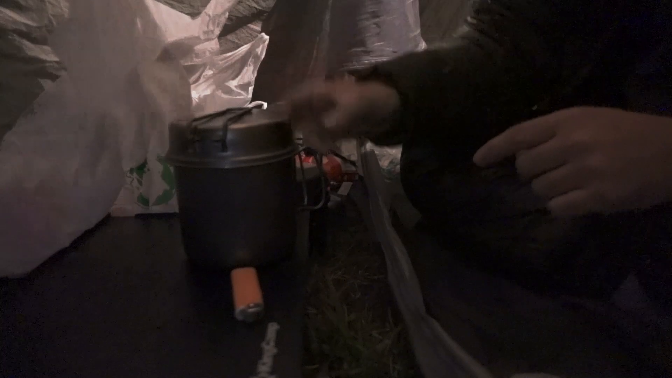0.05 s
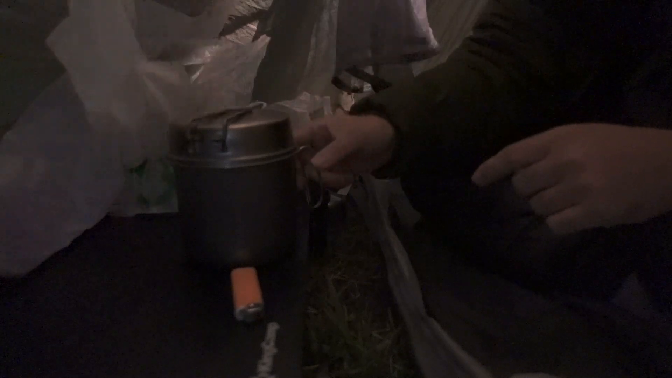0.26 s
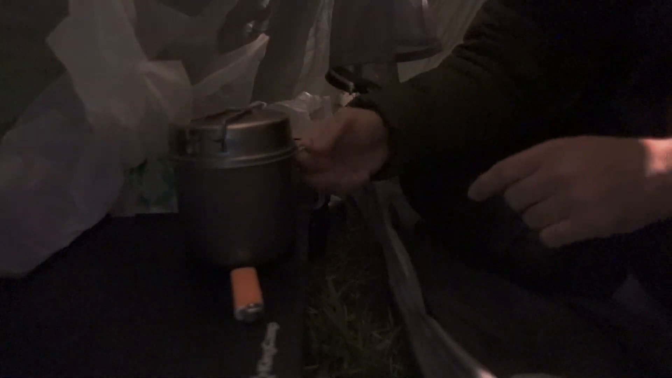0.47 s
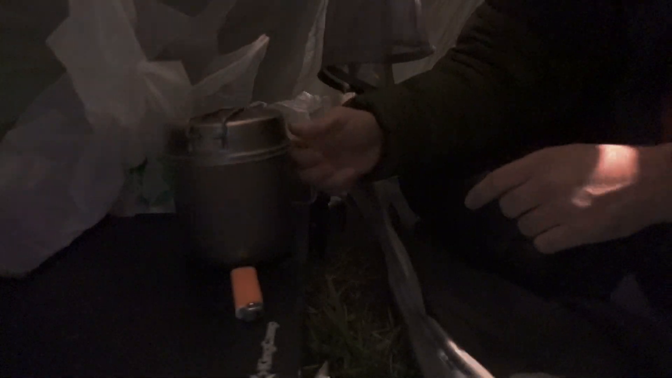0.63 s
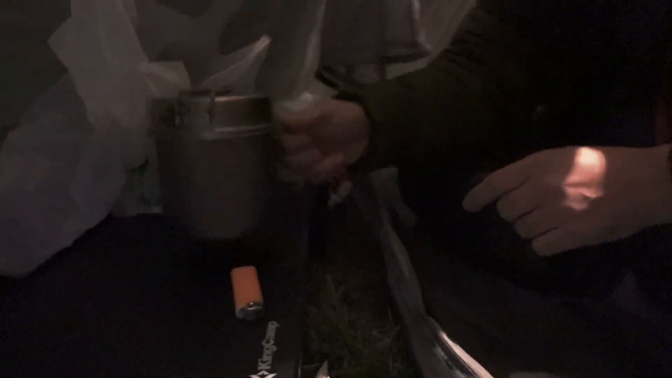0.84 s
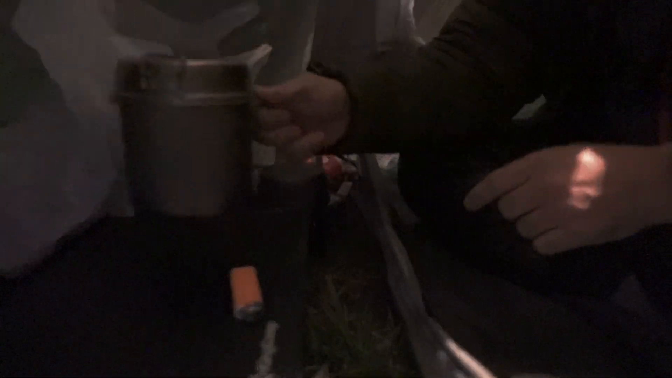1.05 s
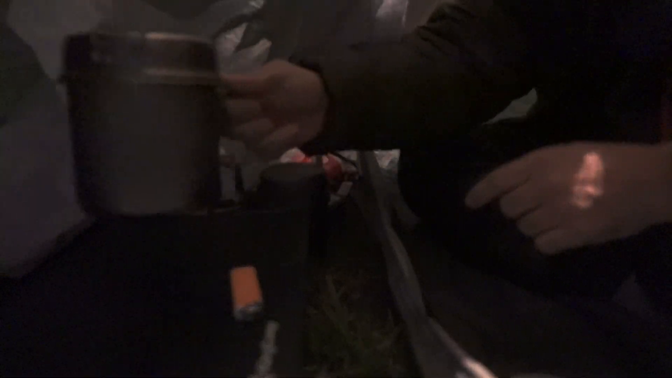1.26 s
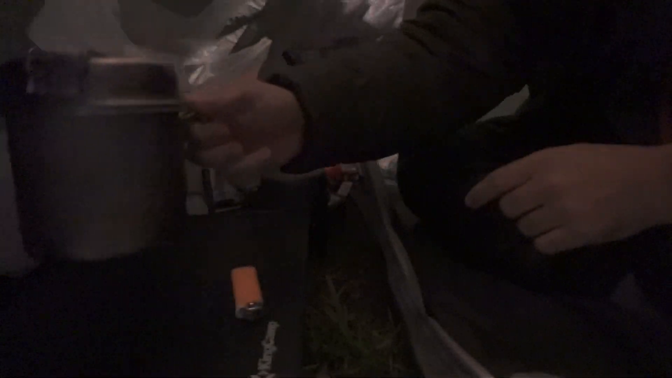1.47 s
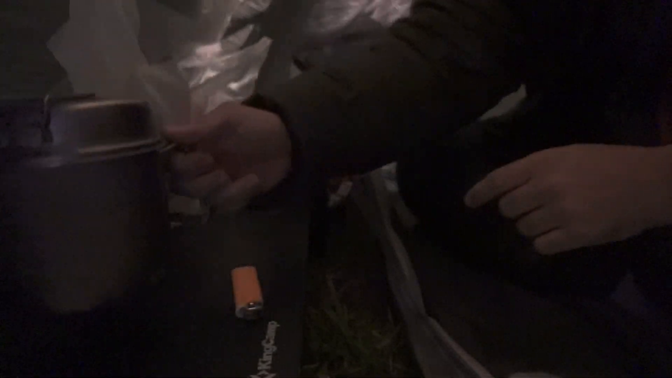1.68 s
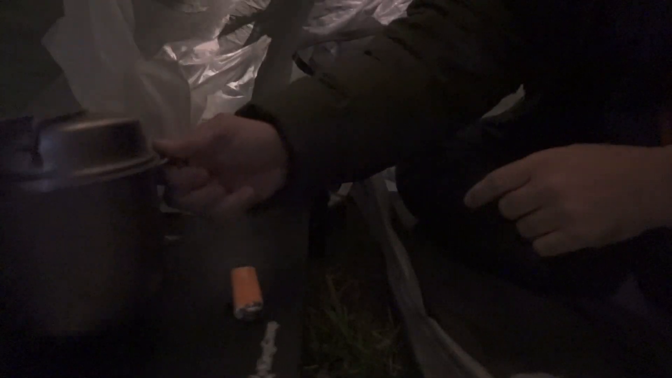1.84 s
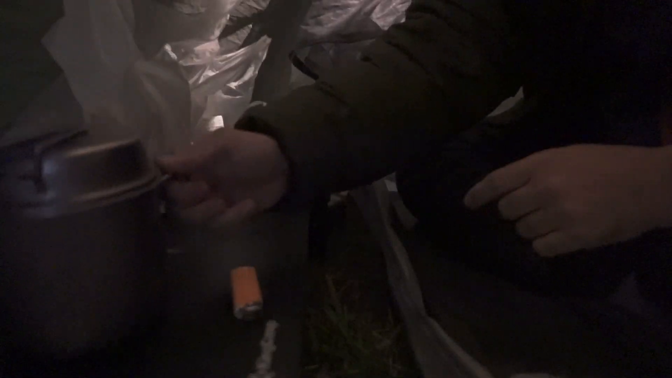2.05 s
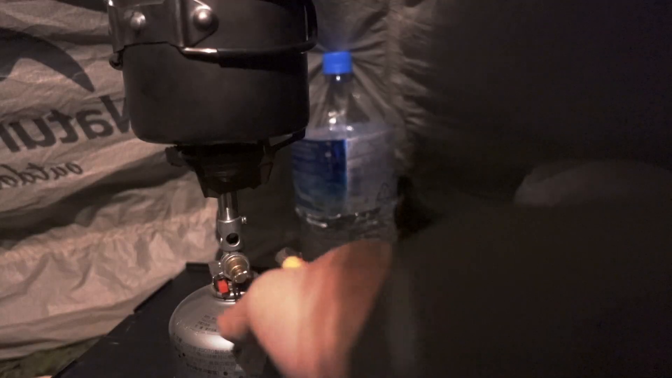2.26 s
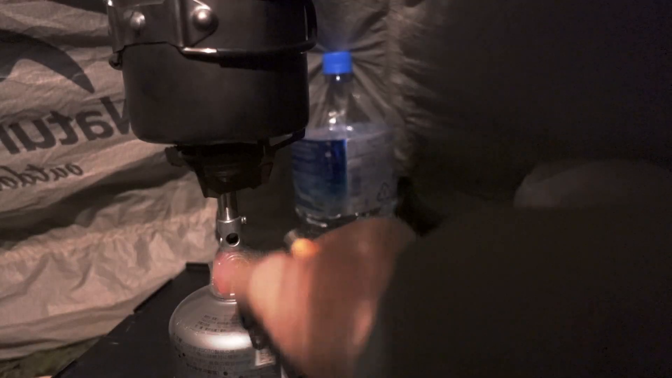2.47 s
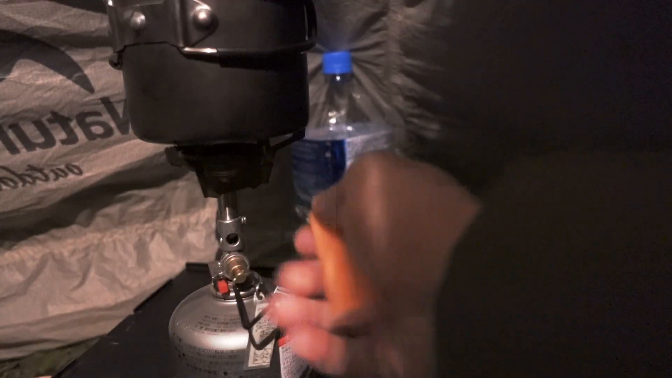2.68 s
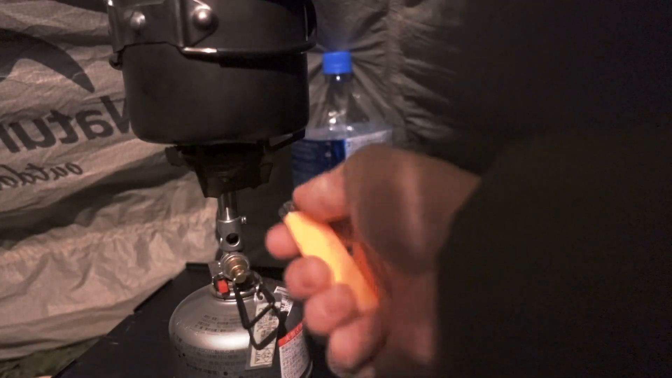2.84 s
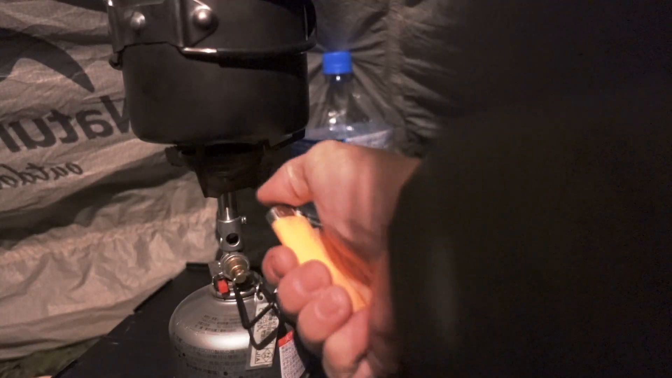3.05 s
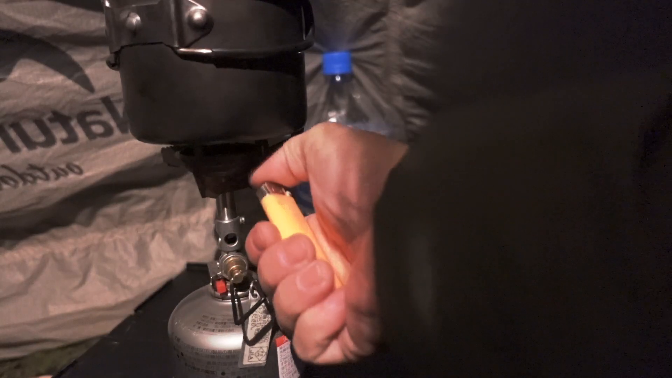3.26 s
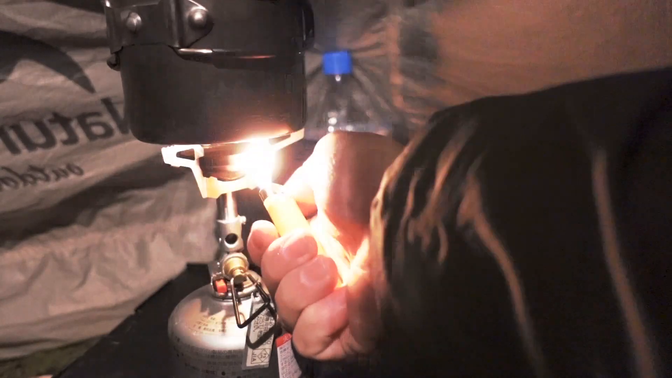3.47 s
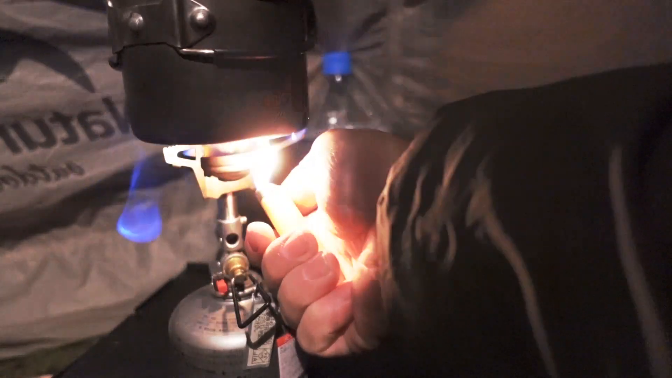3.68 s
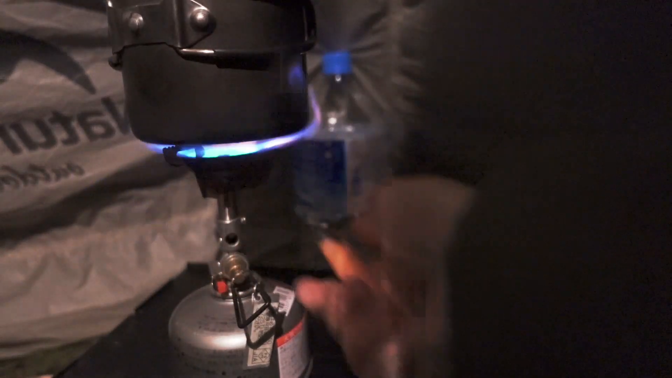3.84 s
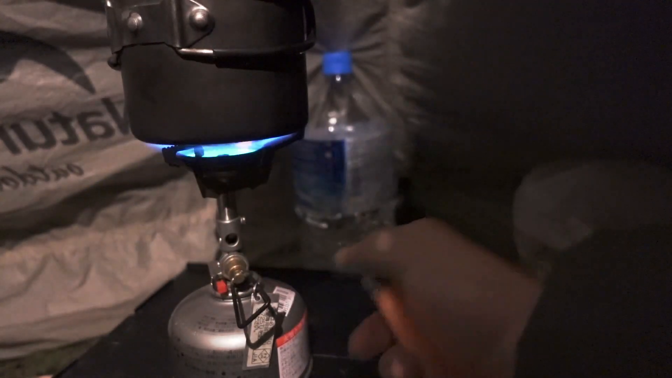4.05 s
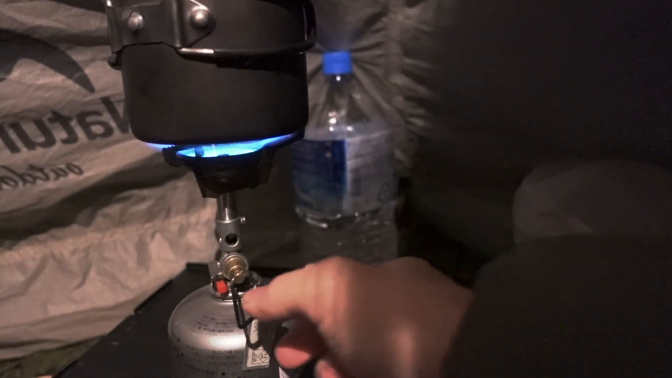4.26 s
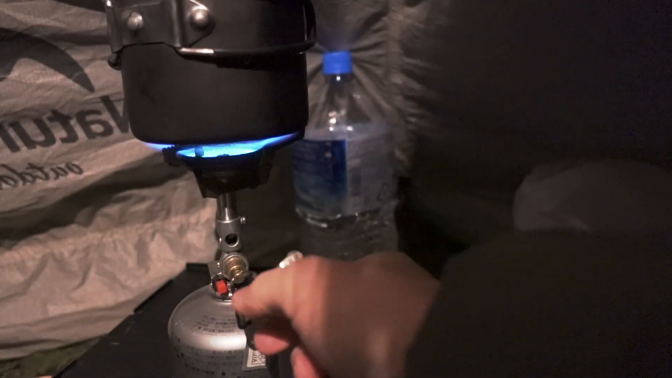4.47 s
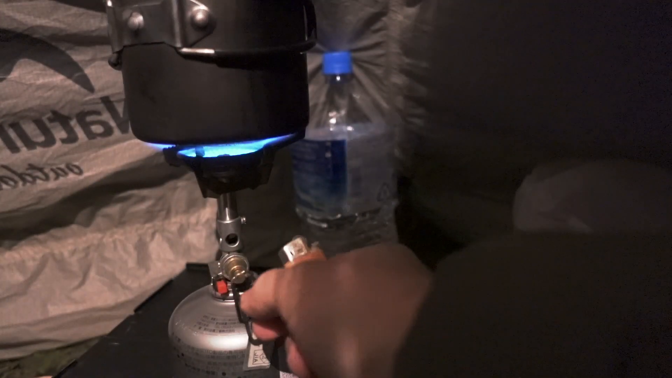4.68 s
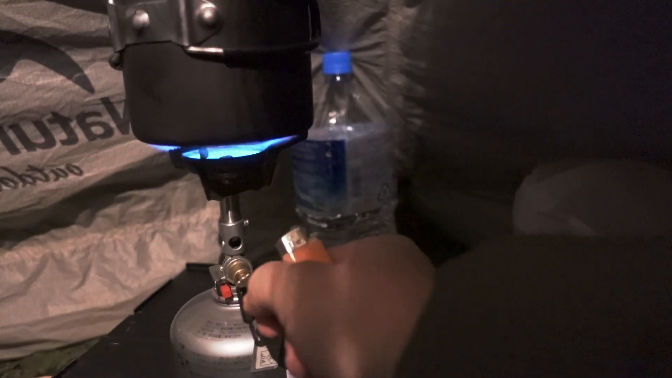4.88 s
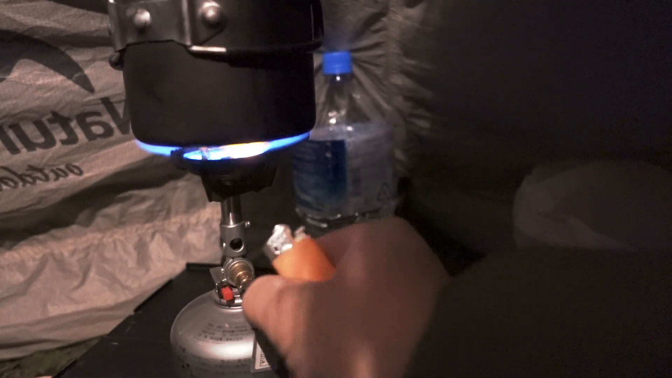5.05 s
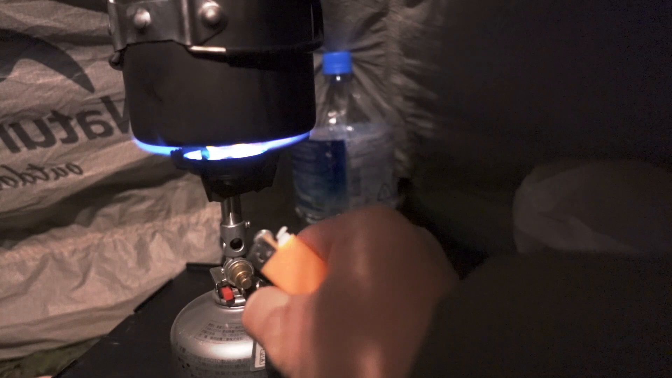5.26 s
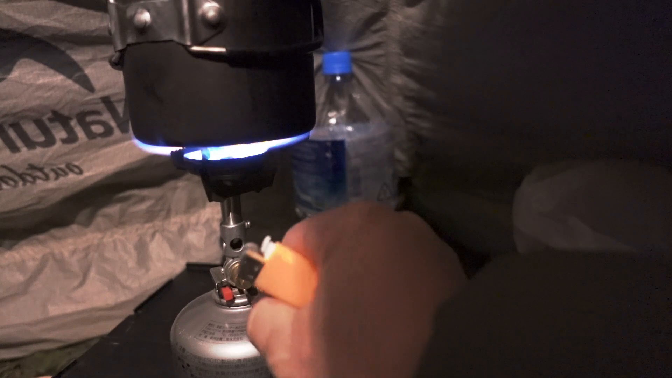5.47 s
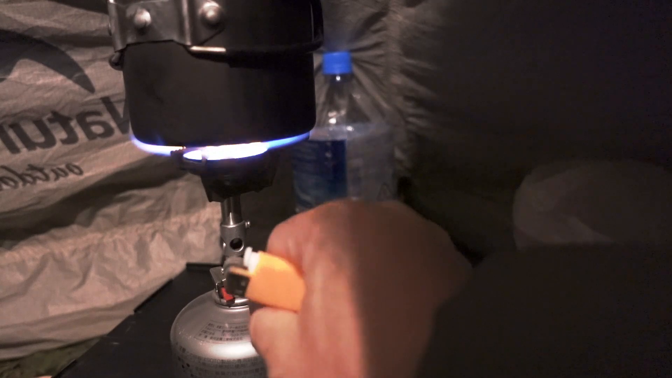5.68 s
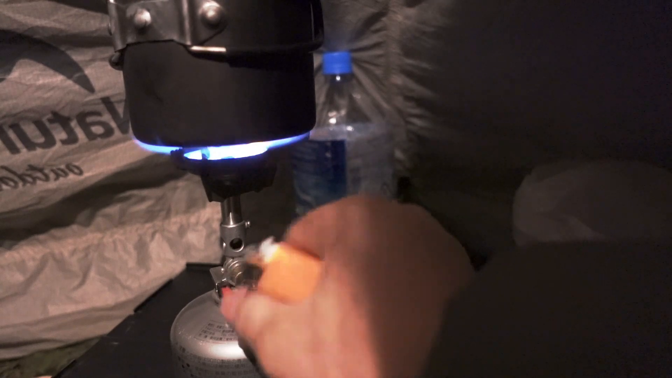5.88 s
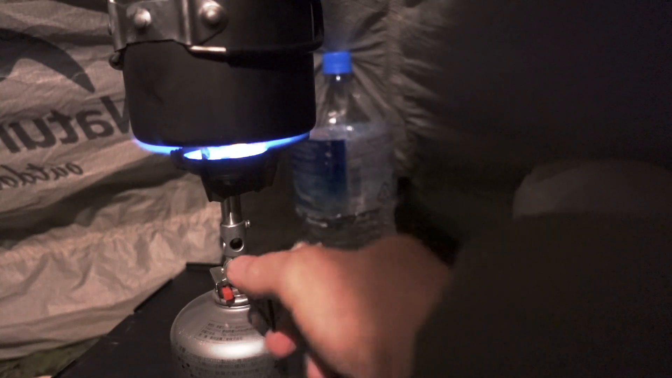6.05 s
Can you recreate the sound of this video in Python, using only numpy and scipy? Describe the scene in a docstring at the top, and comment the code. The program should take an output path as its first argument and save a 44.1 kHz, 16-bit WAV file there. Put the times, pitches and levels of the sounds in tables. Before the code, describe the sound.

Close in a still tent, metal cookware slides, clinks and thumps down, followed by a flint strike, soft gas pops, a stove scrape and strengthening hiss.

```python
"""Inside a tent, close to the microphone: a metal pot is slid and lifted by its rattling handle and set down.
Then a gas valve opens, a lighter is struck, the burner catches with soft pops and its hiss hardens as the valve
turns, while the stove scrapes once over the ground. Still air lies under all, and a low rumble comes in at 2.05
s. Rubs are trains of tiny noisy slips ringing metal, rattles and ticks are short noise bursts, the knock is a
sum of decaying modes, pops are sinking low cycles with noise, and the gas is coloured noise."""
import sys
import numpy as np
from scipy import signal
from scipy.fft import rfft, irfft
from scipy.io import wavfile
from scipy.ndimage import uniform_filter1d, map_coordinates

SR = 44100
rng = np.random.default_rng(int(sys.argv[2]) if len(sys.argv) > 2 else 0)


def to_linear_factor(level_db):
    """Convert decibel levels (scalar or array-like) to linear amplitude factors."""
    exponent = np.asarray(level_db, float) / 20
    return 10 ** exponent


def bounce(signal):
    """Save signal as a 16-bit WAV file at the path given by the first command-line argument."""
    frames = np.transpose(np.atleast_2d(signal))
    limited = np.clip(frames, -1, 1)
    pcm = np.round(limited * 32767).astype(np.int16)
    wavfile.write(sys.argv[1], SR, pcm)


N = 269892  # samples in the scene

# Low rumble that comes in at 2.05 s. Each row: time in seconds, level in dB.
RUMBLE_LEVEL = [(2.05, -42.5), (2.25, -37), (2.93, -35.5), (3.85, -36), (6.12, -35.5)]
# Colour of the rumble and of the still air. Each row: frequency in Hz, relative density in dB per Hz.
RUMBLE_COLOUR = [(15, -80), (25, -55), (44, -17), (70, -19.5), (162, 1), (183, 2), (242, -1), (361, -15),
                 (421, -13), (659, -17.5), (1000, -31.5), (1300, -46), (2200, -120)]
AIR_COLOUR = [(15, -67), (25, -27), (53, -6), (249, 1), (301, 1.5), (335, -4), (641, -9.5), (796, -22),
              (1840, -23), (2610, -25.5), (3520, -26), (8360, -32), (16000, -35)]
# Still air. Each row: time in seconds, level in dB.
AIR_LEVEL = [(0, -44), (.43, -43.5), (.47, -40.5), (2.0, -42.5)]

# Rubbing strokes in full contact. Each row: start in seconds, end in seconds, start level in dB, end level in dB.
POT_STROKES = [(0, .34, -25.5, -25.5), (.38, 0.47, -28.5, -27), (.52, 0.863, -24.5, -24.5),
               (1.5, 1.83, -43.5, -59)]
HANDLE_STROKES = [(0, 0.55, -39.5, -42.5), (.9, 0.97, -45, -31.5), (1.03, 1.19, -30, -33),
                  (1.096, 1.205, -26.5, -28), (1.23, 1.74, -34.5, -50.5)]
SET_DOWN_STROKES = [(2.0795, 2.092, -21, -29.5), (2.092, 2.128, -27, -38.5)]
STOVE_STROKES = [(4.79, 4.865, -42, -28.5), (4.86, 4.945, -30, -28.5), (4.945, 5.02, -31, -34),
                 (5.03, 5.06, -47, -40.5)]
FLINT_STROKES = [(3.452, 3.474, -35.5, -21.5), (3.477, 3.483, -16.5, -17.5), (3.488, 3.512, -31, -40.5)]

# Broad colour of each rubbed thing. Each row: frequency in Hz, relative density in dB per Hz.
POT_COLOUR = [(530, -59), (900, -29), (1220, -60), (1550, -28), (2390, -11), (2830, -14), (4740, -16.5),
              (5960, -0.5), (8250, -20.5), (16000, -29.5)]
HANDLE_COLOUR = [(900, -15.5), (1500, -12.5), (3500, -8), (5400, 0), (9000, -2), (15000, -8.5),
                 (16000, -22)]
GROUND_COLOUR = [(300, -12), (700, -5.5), (1200, -12.5), (7840, -12), (13200, -20.5), (16000, -38)]
STOVE_COLOUR = [(210, -32), (350, -8), (530, -2), (871, -16.5), (1070, -9), (1630, -23.5), (3030, -18),
                (3620, -23.5), (7790, -16.5), (16000, -36)]
WHEEL_COLOUR = [(530, -68), (900, -42), (1470, -19), (2660, -20), (3150, -12.5), (5410, -16.5),
                (7230, -6.5), (9880, -7), (16000, -24)]
# What rings in each. Each row: frequency in Hz, width in Hz, relative level in dB.
POT_RINGS = [(1210, 220, -29), (2393, 145, -5), (2840, 184, -2.5), (3444, 140, -6.5), (4100, 160, -15),
             (4530, 88, -11), (5060, 70, -6), (5350, 170, -1.5), (5810, 81, 4), (7420, 21, -0.5)]
HANDLE_RINGS = [(6160, 490, -13), (9200, 2300, -1), (12400, 1100, -8)]
STOVE_RINGS = [(548, 41, 2), (633, 40, 1.5), (1014, 18, 1.5), (1088, 42, -4), (1465, 72, -12.5),
               (3080, 58, -10.5), (4020, 170, -13.5), (4560, 150, -16), (8100, 430, -21)]
WHEEL_RINGS = [(3100, 550, -8.5), (6100, 640, -6), (7400, 900, -5), (9700, 830, -3.5)]
# Modes of the pot hitting the ground. Each row: frequency in Hz, width in Hz, relative level in dB.
KNOCK_MODES = [(255, 21, 1), (494, 21, 6), (694, 50, 3.5), (775, 22, -17), (1200, 81, -0.5), (1580, 83, 4),
               (2295, 11, -11), (4550, 12, -6), (5250, 40, 2.5), (5800, 39, -0.5), (7600, 15, -19)]

# Gas flow. Each row: time in seconds, hiss level in dB, timbre (0 jet, 1 lit, 2 and above wide).
GAS = [(2.13, -51, 1.5), (2.33, -57.5, 0.5), (2.4, -54, 0.3), (2.9, -47.5, 0.2), (3.4, -52.5, 0.27),
       (3.7, -49, 1.6), (3.85, -46.5, 1.54), (4.1, -48.5, 0.96), (4.4, -52.5, 0.3), (4.58, -53.5, 1.4),
       (4.74, -54, 0.2), (5.1, -51, 1.2), (5.3, -49, 1.75), (5.55, -44.5, 1.8), (6.12, -44, 2.04)]
# Broad colour of each gas timbre. Each row: frequency in Hz, relative density in dB per Hz.
JET_COLOUR = [(530, -32), (900, -19), (1250, -32), (2660, 3.5), (6640, 0.5), (7580, 1), (8350, -2),
              (16000, -4)]
LIT_COLOUR = [(530, -32), (900, -8), (1150, -19), (1590, -28), (2120, -9), (5680, -9), (8250, -2.5),
              (16000, -14)]
WIDE_COLOUR = [(380, -26), (560, 20.5), (700, 9.5), (2000, -15), (2960, -5), (3790, -2), (4430, -1),
               (10300, 1), (16000, -13)]
# Resonances of each gas timbre. Each row: frequency in Hz, width in Hz, relative level in dB.
JET_RINGS = [(2700, 300, -5), (3840, 470, -6), (7500, 220, 10), (9500, 360, 5), (11500, 1400, 1.5)]
LIT_RINGS = [(1580, 150, -3), (2600, 440, -3), (6300, 280, -1), (7050, 240, 2), (8100, 500, 1.5),
             (10630, 840, 0.5)]
WIDE_RINGS = [(1400, 300, 3.5), (2530, 340, -3), (3790, 550, 2), (7000, 580, -4), (8250, 257, -6),
              (10400, 600, -2.5)]

# Puffs of gas catching fire. Each row: start in seconds, nominal peak in dB, pitch in Hz, cycles, rip peak in dB.
POPS = [(3.567, -19, 227, 5.8, -8), (3.5835, -12, 175, 3, -8), (3.594, -16.5, 111, 1.5, -42),
        (3.685, -6, 187, 3.05, -12.5), (4.774, -24.5, 210, 3.7, -45)]
# Latch and loose wire handle. Each row: time in seconds, nominal peak in dB, centre in Hz, t60 in seconds.
RATTLES = [(0.35, 0.5, 6900, 0.11), (0.9975, -10, 7860, 0.028), (1.007, -10, 9500, 0.05),
           (1.026, -4, 7300, 0.015), (1.046, -11, 7900, 0.012), (1.096, -11, 7500, 0.036),
           (1.132, -19, 12500, .02), (1.282, -20.5, 7800, 0.018), (1.297, -9.5, 8500, 0.031),
           (1.3073, -16, 6000, 0.013), (1.329, -12.5, 6500, .02), (1.35, -14, 7000, 0.04),
           (1.378, -1.5, 7700, 0.024), (1.415, -17, 6540, .015), (1.529, -5.5, 6800, 0.012),
           (1.5421, -6.5, 5800, 0.018), (1.607, -23, 4630, 0.0098), (1.7872, -12, 5600, 0.018)]
# Short ticks: one at the pot's set-down, the rest from lighter, valve and stove legs. Each row: time in seconds,
# nominal peak in dB, centre in Hz, spread in octaves, t60 in seconds.
TICKS = [(2.0794, -10, 4500, 0.94, 0.0061), (2.182, -30.5, 4340, 1, 0.061), (2.9032, -24, 3680, 0.2, 0.072),
         (2.923, -27.5, 4500, .6, .03), (3.088, -30, 7000, 0.83, .07), (3.401, -31, 2800, .4, .012),
         (3.409, -23.5, 3140, 0.29, 0.014), (3.416, -24, 3280, 0.29, 0.015),
         (3.4093, -26, 8000, 0.45, .008), (3.417, -32, 8000, .5, .008), (3.7925, -26, 3500, 1.5, 0.014),
         (4.797, -20, 7700, 0.34, 0.076), (4.875, -23, 5600, 0.74, 0.039), (4.914, -2, 7900, 0.28, 0.045),
         (4.915, -14.5, 593, 0.48, 0.028), (5.814, -32, 5080, 0.12, .04)]
# Brief noise swells: grazes at pot and stove, plus whistle, body and treble of the gas pops. Each row: start in
# seconds, nominal peak in dB, centre in Hz, spread in octaves (at least 0.1 sounds), length in seconds.
SWELLS = [(0.953, -19.5, 6300, 0.48, 0.028), (1.107, -14.5, 4000, 2.1, 0.041),
          (1.186, -14, 4730, 1.5, 0.033), (1.296, -18.5, 6050, 0.86, 0.03),
          (1.33, -18.5, 5600, 0.87, 0.024), (1.457, -8, 5940, 0.93, 0.023), (1.51, -19, 6200, 0.71, 0.013),
          (2.881, -30.5, 8000, .8, 0.063), (3.247, -29.5, 5470, .9, 0.055),
          (3.672, -19.5, 4430, 0.077, 0.0095), (3.676, -20, 5500, 0.18, 0.019),
          (3.582, -21, 5530, 0.74, 0.016), (3.672, -28, 7500, 0.52, 0.06),
          (3.671, -24.5, 1270, 0.86, 0.032), (4.99, -22, 6500, 0.52, 0.049),
          (5.026, -24.5, 7950, 0.56, 0.05), (5.969, -33.5, 1700, .7, 0.02)]
# Faint narrow sighs, perhaps cloth or sleeve. Each row: start in seconds, nominal peak in dB, pitch in Hz,
# length in seconds, left minus right in dB.
SIGHS = [(0.718, -29.5, 1200, 0.38, 0), (1.397, -31, 1350, 0.33, 2), (4.295, -36.5, 8450, 0.19, -12),
         (4.404, -38, 1580, 0.22, -8)]

# Stereo width. Each row: frequency in Hz, side minus mid in dB.
SIDE_CLOSE = [(40, -26), (90, -33), (200, -26), (600, -21), (1400, -17), (3000, -15), (6000, -13.5),
              (11000, -8)]  # most rubs and the bursts at the stove
SIDE_HANDLE = [(600, -10), (2500, -20), (5500, -10.5), (9000, -4.5)]
SIDE_OPEN = [(40, -26), (90, -62), (200, -28.5), (600, -10.5), (1400, -4.5), (3000, -7.5), (6000, -3),
             (11000, -5)]  # air, rumble and gas
# Stereo lean. Each row: frequency in Hz, left minus right in dB.
LEAN_POT = [(200, 0), (600, -1), (1400, 0), (3000, -2), (6000, -5), (10000, -3.5)]
LEAN_HANDLE = [(200, -3), (600, 5), (1400, 8.5), (3000, -0.5), (6000, 0.5), (11000, 1.5)]
LEAN_STOVE = [(200, -0.5), (600, 2), (1400, 1), (3000, -1.5), (6000, -4.5), (11000, -0.5)]
# Microphone response. Each row: frequency in Hz, gain in dB.
MIC = [(20, -30), (40, -15.5), (80, -1.5), (120, 2), (15700, 1), (15900, -31)]

SET_DOWN_S = 2.0795  # when the pot meets the ground
LEAD = 256  # samples kept ahead of a burst for the swing-in of its filter
POT_PAN_DB, STOVE_PAN_DB = 1.5, -1  # left minus right: pot to the left, hands at the stove to the right


def evened(x):
    """Scales to rms 1."""
    return x / np.sqrt(np.mean(x ** 2) + 1e-20)


def read(points, hz):
    """Reads a spectrum table on a log-frequency axis."""
    f, value = np.transpose(points)
    return np.interp(np.log(hz + 1), np.log(f + 1), value)


def add(mix, s, sound):
    """Mixes a two-channel sound in at time s."""
    part = mix[:, round(s * SR):][:, :sound.shape[1]]
    part += sound[:, :part.shape[1]]


def noise_pair(size):
    """Independent white noise for mid and side."""
    return rng.standard_normal((2, size))


def wander(size, span):
    """Slow random drift of rms 1 that changes over about span seconds."""
    width = int(span * SR)
    return evened(uniform_filter1d(uniform_filter1d(rng.standard_normal(size), width), width))


def colour(x, bed, rings=(), bed_db=0., side=SIDE_OPEN, lean=LEAN_STOVE):
    """Filters a (mid, side) pair by a broad bed plus resonances and turns it into left and right of rms 1."""
    hz = np.fft.rfftfreq(x.shape[1], 1 / SR)
    power = to_linear_factor(2 * (read(bed, hz) + bed_db))
    for f, width, db in rings:
        power = power + to_linear_factor(2 * db) / (1 + (2 * (hz - f) / width) ** 2) ** 2
    mid, apart = rfft(x) * np.sqrt(power)
    apart = apart * to_linear_factor(read(side, hz))
    tilt = to_linear_factor(read(lean, hz) / 2)
    return evened(irfft(np.array([(mid + apart) * tilt, (mid - apart) / tilt]), x.shape[1]))


def waver(x, drift):
    """Resonances slide up and down by about the share drift, as when pressure on an object shifts."""
    at = np.cumsum(1 + drift * wander(x.shape[1], .05))
    return np.array([map_coordinates(side, [at], order=3, mode="wrap") for side in x])


def patchy(x, depth_db):
    """Contact and flow keep shifting: patches some 600 Hz by 30 ms grow louder or softer."""
    z = signal.stft(x, nperseg=256, noverlap=192)[2]
    field = rng.standard_normal(z.shape[:0:-1]).T
    for axis, size in ((0, 3), (1, 14), (0, 3), (1, 14)):  # frequency bins, time frames
        field = uniform_filter1d(field, size, axis)
    shifted = signal.istft(z * to_linear_factor(depth_db * evened(field)), nperseg=256, noverlap=192)[1]
    return evened(shifted[:, :x.shape[1]])


def contact(strokes, grip):
    """Level in dB over the scene: contact builds, runs along each stroke and lets go."""
    t = np.arange(N) / SR
    rise, fall = grip  # dB per second
    levels = []
    for start, end, start_db, end_db in strokes:
        along = np.interp(t, (start, end), (start_db, end_db))
        levels.append(along - rise * np.maximum(start - t, 0) - fall * np.maximum(t - end, 0))
    return np.max(levels, 0)


def rub(strokes, grip, bed, rings, bed_db, slips_per_s, spread_db, patchy_db, lean, drift=0.00392, side=SIDE_CLOSE):
    """Tiny slips of uneven size, each a puff of noise of about 1 ms, ring the rubbed object under the stroke."""
    slips = rng.random(N) < slips_per_s / SR
    sizes = to_linear_factor(spread_db * np.minimum(rng.exponential(1, N), 4)) * slips
    puffs = np.sqrt(signal.lfilter([1], [1, -.96], sizes ** 2))
    sound = colour(puffs * noise_pair(N), bed, rings, bed_db, side, lean)
    sound = patchy(waver(sound, drift), patchy_db)
    return sound * to_linear_factor(contact(strokes, grip))


def burst(shape, peak_db, hz, octaves, pan_db):
    """Noise under an envelope, centred on a pitch; the tent cloth adds a short tail, wider in the treble."""
    f = np.fft.rfftfreq(len(shape), 1 / SR)
    mid, both, apart = rng.standard_normal((3, len(shape)))
    echo = signal.lfilter([1], [1, -to_linear_factor(-120 / (.12 * SR))], shape ** 2)  # power, t60 of 0.12 s
    echo = to_linear_factor(-21.5) * np.sqrt(echo / echo.max())
    mid = rfft(np.sign(mid) * shape + both * echo)
    apart = rfft(apart * (1.7 * echo + shape)) * to_linear_factor(read(SIDE_HANDLE if pan_db > 0 else SIDE_CLOSE, f))
    away = np.log2((f + 30) / hz) / max(octaves, .1)
    band = (1 + away ** 4) ** np.where(away < 0, .55, .65)  # steeper above the centre
    sound = irfft(np.array([mid + apart, mid - apart]) / band, len(shape))
    sound = np.roll(sound, LEAD, axis=1) * np.clip(np.linspace(8, -1, len(shape)), 0, 1)
    # loudest 60-sample rms, taken as 4.4 times below the peak
    sound /= 4.4 * np.sqrt(uniform_filter1d(sound ** 2, 60, axis=1).mean(0).max())
    return sound * to_linear_factor(peak_db + np.array([[pan_db], [-pan_db]]) / 2)


def click(s, peak_db, hz, octaves, t60, pan_db):
    """A sharp crack: noise with a half-millisecond onset and an exponential decay."""
    t = np.arange(8192) / SR
    shape = to_linear_factor(-60 * t / t60) * (1 - np.exp(-t / 0.00053))
    return s - LEAD / SR, burst(shape, peak_db, hz, octaves, pan_db)


def swell(s, peak_db, hz, octaves, length, pan_db):
    """Noise that swells and fades softly."""
    u = np.minimum(np.arange(16384) / SR / length, 1)
    return s - LEAD / SR, burst(np.sin(np.pi * u ** 0.72) ** 2, peak_db, hz, octaves, pan_db)


def outdoors():
    """Still air throughout as steady noise; from 2.05 s a lumpier low rumble, nearly the same on both sides."""
    t = np.arange(N) / SR
    s, level_db = np.transpose(RUMBLE_LEVEL)
    lumps = to_linear_factor(0.35 * wander(N, 0.023) + np.interp(t, s, level_db, left=-200))
    rumble = colour(noise_pair(N), RUMBLE_COLOUR) * lumps
    air = colour(noise_pair(N), AIR_COLOUR) * to_linear_factor(np.interp(t, *np.transpose(AIR_LEVEL)))
    return rumble + air


def sighs(mix):
    """Faint slow swells of narrow noise, 0.14 octaves in spread."""
    for s, db, hz, length, pan_db in SIGHS:
        add(mix, *swell(s, db, hz, 0.14, length, pan_db))


def swells(mix):
    """Brief noise swells: grazes at pot and stove, plus whistle, body and treble of the gas pops."""
    for row in SWELLS:
        add(mix, *swell(*row, POT_PAN_DB if row[0] < SET_DOWN_S else STOVE_PAN_DB))


def ticks(mix):
    """Short noise bursts: one at the pot's set-down, the rest from lighter, valve and stove legs."""
    for row in TICKS:
        add(mix, *click(*row, STOVE_PAN_DB))


def pot_slide():
    """The sliding pot's slips ring its wall; contact builds gently."""
    return rub(POT_STROKES, (59, 260), POT_COLOUR, POT_RINGS, -0.41, slips_per_s=4000, spread_db=0.24,
               patchy_db=0.59, lean=LEAN_POT, drift=0.00433)


def handle_rub():
    """The wire handle's slips give a bright rub with broad resonances."""
    return rub(HANDLE_STROKES, (930, 800), HANDLE_COLOUR, HANDLE_RINGS, -0.96, slips_per_s=4000, spread_db=0.55,
               patchy_db=2.0, lean=LEAN_HANDLE, side=SIDE_HANDLE)


def set_down_rub():
    """Slips as the pot meets the ground, with an almost instant grip and no resonances."""
    return rub(SET_DOWN_STROKES, (19000, 8000), GROUND_COLOUR, (), 0, slips_per_s=6000, spread_db=0.67,
               patchy_db=2.0, lean=LEAN_HANDLE, side=SIDE_HANDLE)


def knock():
    """One blow rings the pot's modes, which are cut short by a 3.7 ms fade; it leans 2.4 dB to the left."""
    t = np.arange(0, .052, 1 / SR)
    ring = 0
    for hz, width, db in KNOCK_MODES:
        ring = ring + to_linear_factor(db) * np.exp(-np.pi * width * t) * np.sin(2 * np.pi * hz * t)
    ring *= np.clip((t[-1] - t) / 0.0037, 0, 1)
    return SET_DOWN_S, to_linear_factor(-10.5) * ring / abs(ring).max() * to_linear_factor([[1.2], [-1.2]])


def rattles(mix):
    """Latch and loose wire handle strike brightly; the pot wall answers each with a duller tap."""
    octaves, wall_db, wall_hz, wall_t60 = 0.62, -22, 1400, 0.035  # wall level is relative to the rattle
    for s, db, hz, t60 in RATTLES:
        add(mix, *click(s, db, hz, octaves, t60, POT_PAN_DB))
        add(mix, *click(s, db + wall_db, wall_hz, octaves, wall_t60, POT_PAN_DB))


def stove_scrape():
    """The stove's slips over the ground ring its narrow metal modes."""
    return rub(STOVE_STROKES, (270, 270), STOVE_COLOUR, STOVE_RINGS, -1.54, slips_per_s=1900, spread_db=0.69,
               patchy_db=1.6, lean=LEAN_STOVE, drift=0.00098)


def flint_wheel():
    """The lighter's wheel rasps on the flint in slips of very uneven size."""
    return rub(FLINT_STROKES, (1040, 1200), WHEEL_COLOUR, WHEEL_RINGS, -1.5, slips_per_s=2400, spread_db=1.1,
               patchy_db=2.1, lean=LEAN_STOVE)


def pop(s, peak_db, hz, cycles, rip_db):
    """A push of pressure: a few low cycles sink in pitch, with a dull rip and bright edge of the flame front."""
    u = np.arange(0, cycles / hz, 1 / SR) * hz / cycles  # 0 to 1 along the pop
    wave = -np.sin(2 * np.pi * cycles * u * (1.15 - 0.23 * u)) * np.sin(np.pi * u ** 0.51)
    start, sound = click(s, rip_db, 410.0, 0.71, 0.017, 0)
    bright_edge = click(s, rip_db - 8.5, 2040, 0.73, 0.015, 0)[1]
    add(sound, 0, bright_edge)
    add(sound, s - start, to_linear_factor(peak_db) * np.array([wave, wave]))
    return start, sound


def gas():
    """Jet noise in the burner tube; its resonances crossfade between three timbres as the flow and flame change."""
    s, level_db, timbre = np.transpose(GAS)
    t = np.arange(s[0], N / SR, 1 / SR)
    place = np.clip(np.interp(t, s, timbre), 0, 2)
    hiss = 0
    for k, (bed, rings) in enumerate(((JET_COLOUR, JET_RINGS), (LIT_COLOUR, LIT_RINGS), (WIDE_COLOUR, WIDE_RINGS))):
        layer = patchy(waver(colour(noise_pair(len(t)), bed, rings, -5.), .003), .9)
        hiss = hiss + layer * np.sqrt(np.clip(1 - abs(place - k), 0, 1))
    flutter_db = wander(len(t), 0.034)
    return s[0], hiss * to_linear_factor(np.interp(t, s, level_db) + flutter_db)


def scene():
    """All sources at their times."""
    mix = outdoors()
    sighs(mix)
    swells(mix)
    ticks(mix)
    mix += pot_slide() + handle_rub() + set_down_rub()
    add(mix, *knock())
    rattles(mix)
    mix += stove_scrape() + flint_wheel()
    for row in POPS:
        add(mix, *pop(*row))
    add(mix, *gas())
    return mix


def smoothed(x, s):
    """One-pole smoothing with a time constant of s seconds."""
    pole = np.exp(-1 / (s * SR))
    return signal.lfilter([1 - pole], [1, -pole], x)


def top_cut(x):
    """Nothing passes above the cut-off."""
    return signal.sosfilt(signal.butter(12, 16620, fs=SR, output="sos"), x)


def record(dry):
    """The microphone drops deep bass and top treble; gain control ducks after loud moments."""
    heard = irfft(rfft(dry) * to_linear_factor(read(MIC, np.fft.rfftfreq(N, 1 / SR))), N)
    power_db = 10 * np.log10(smoothed((heard ** 2).mean(0), 0.0011) + 1e-12)
    fall = np.arange(N) * 79.0 / SR  # the held level sinks 79 dB a second
    held_db = np.maximum.accumulate(power_db + fall) - fall
    over_db = np.maximum(held_db + 17.5, 0)  # threshold -17.5 dB
    ducked = heard / to_linear_factor(0.66 * smoothed(over_db, 0.016))
    return top_cut(ducked)


dry = scene()
out = record(dry)
bounce(out)
```